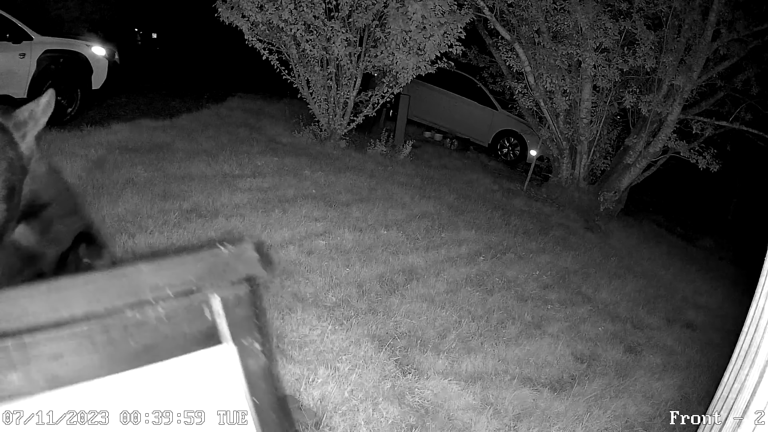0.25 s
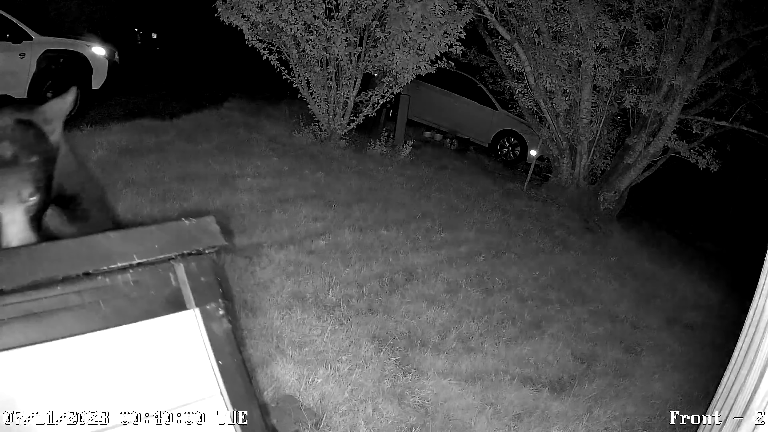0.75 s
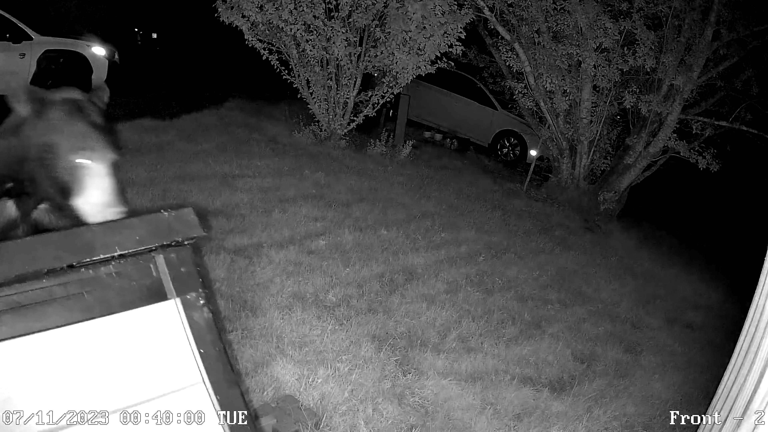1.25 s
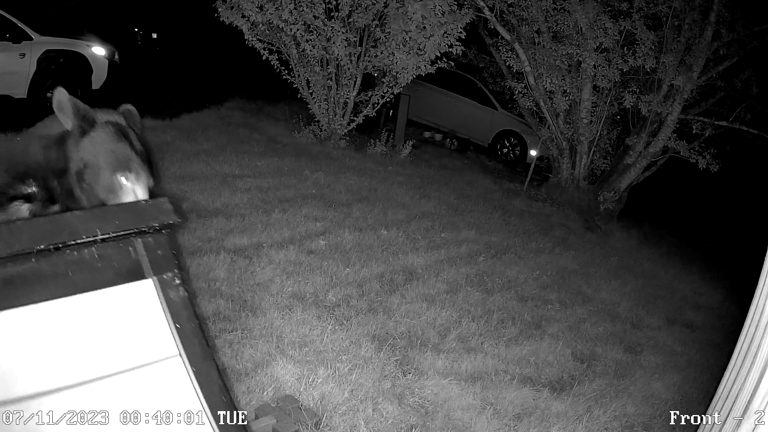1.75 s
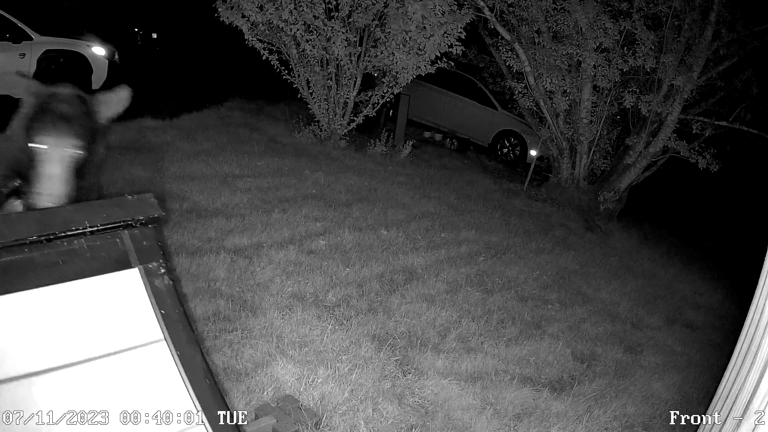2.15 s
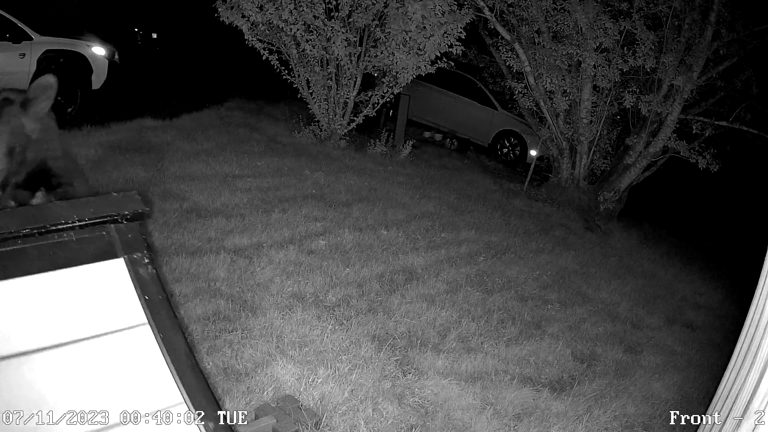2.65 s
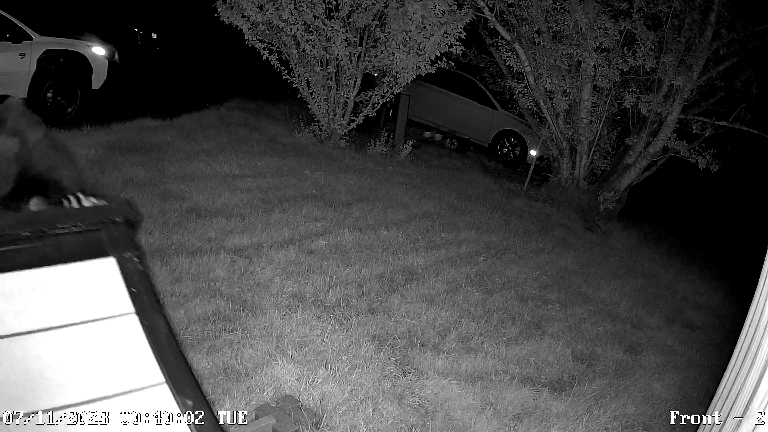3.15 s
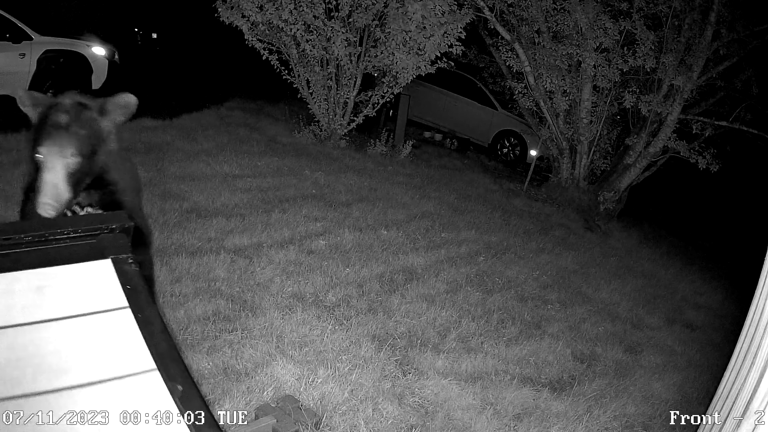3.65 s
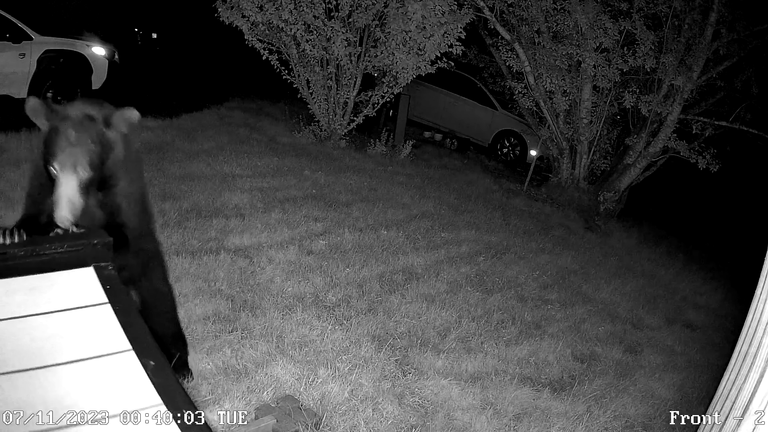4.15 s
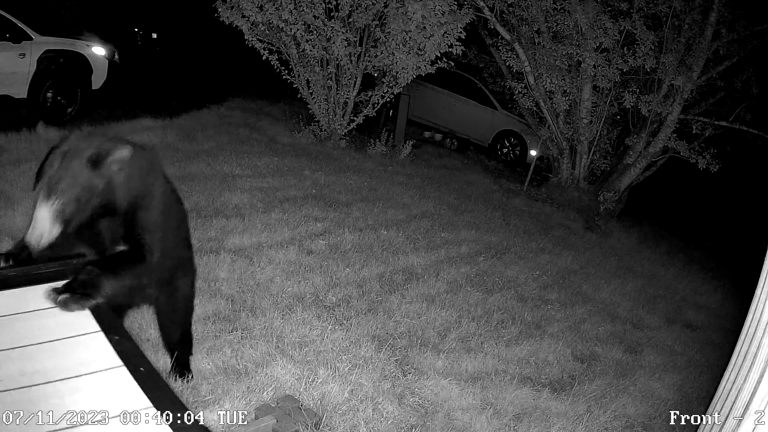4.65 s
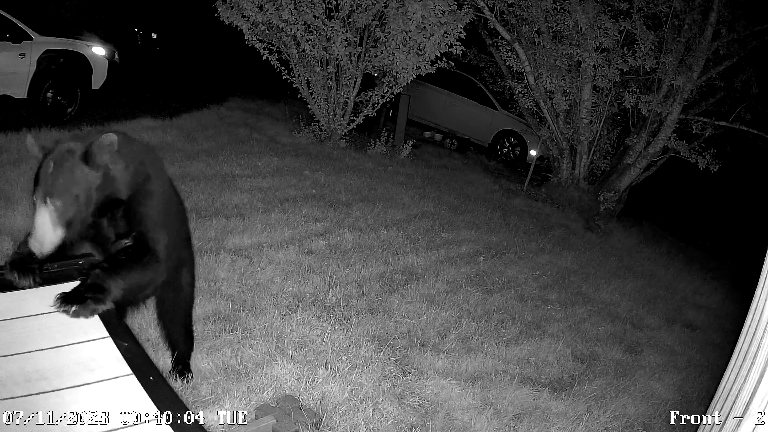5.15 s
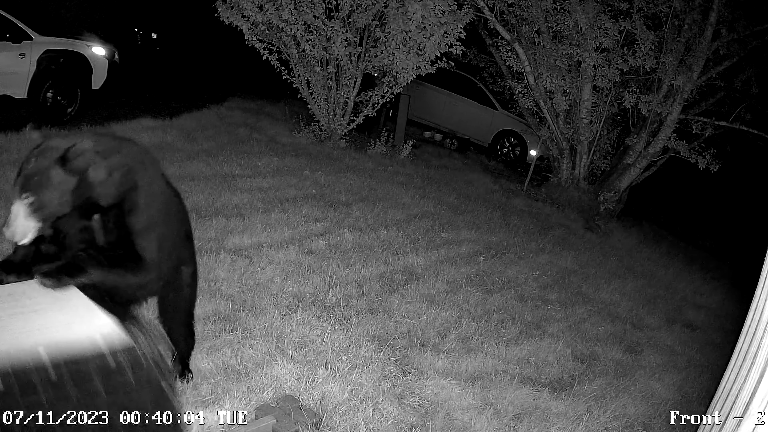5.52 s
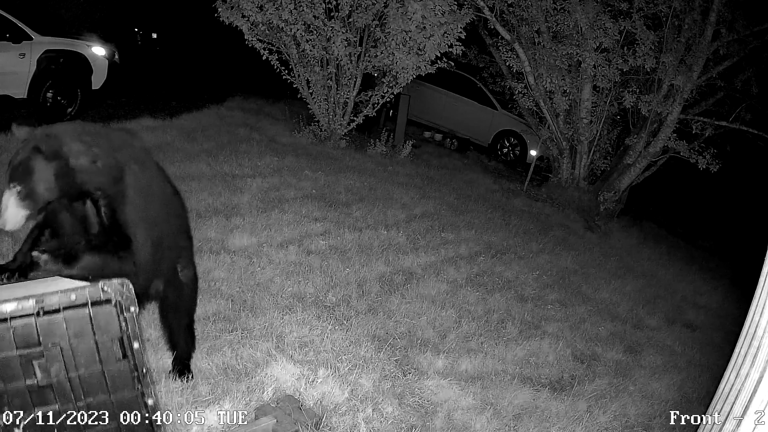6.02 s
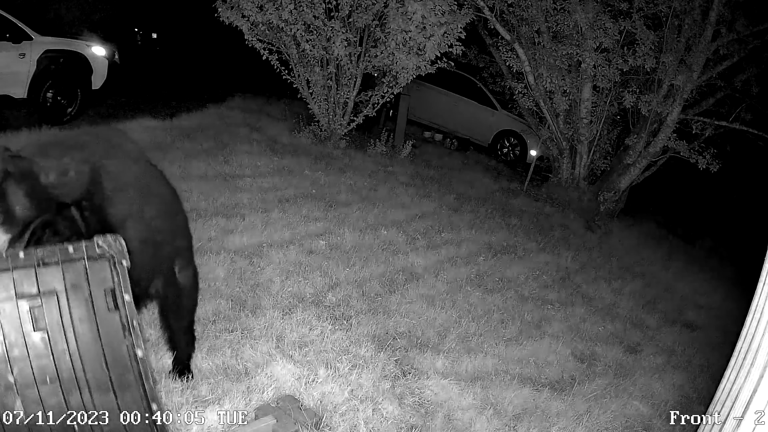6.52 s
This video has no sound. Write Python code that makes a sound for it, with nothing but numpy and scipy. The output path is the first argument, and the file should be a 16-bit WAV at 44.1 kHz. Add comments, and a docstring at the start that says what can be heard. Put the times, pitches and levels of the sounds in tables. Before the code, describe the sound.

A large, hollow plastic bin is pushed, dragged and tipped on a quiet night lawn. Soft scuffs give way to a burst of thumps, near-quiet with one small clonk, then a second run of hard knocks. Rasping grit and sharp clicks build to the loudest crash, a tumble of deep booms, then two lone blows. Slightly dull, band-limited close pickup with a short, weak outdoor echo.

```python
"""A bear paws at a big hollow plastic bin beside a house at night, drags it and tips it over.
Light shoves and faint knocks come first, then booming blows, one light clonk and a second run of blows.
Gritty scraping and short bright ticks lead to the heaviest crash of booms; two strong single blows follow.
Scrapes rasp by stick and slip and feed resonances; blows excite decaying modes and rebound once.
A small outdoor camera microphone close by hears it over a faint, steady hiss of filtered noise."""
import sys
import numpy as np
from scipy import signal
from scipy.fft import rfft, irfft, next_fast_len
from scipy.io import wavfile

SR = 44100
rng = np.random.default_rng(int(sys.argv[2]) if len(sys.argv) > 2 else 0)


def store_wav(level_fs):
    """Save 16-bit WAV to argv[1]."""
    pcm = np.round(np.clip(np.atleast_2d(level_fs), -1, 1) * 32767)
    wavfile.write(sys.argv[1], SR, pcm.T.astype(np.int16))


N = 298998
TIME = np.arange(N) / SR


def from_db(db):
    """Logarithmic level: 20 dB is a tenfold amplitude."""
    return 10 ** (np.asarray(db) / 20)


def rms_one(x):
    """Normalisation: divide by the root mean square for unit power."""
    return x / np.sqrt(np.mean(x ** 2) + 1e-20)


def add(out, start_s, sound):
    """Superposition: mix a sound in from its start time."""
    start = round(start_s * SR)
    out[start:start + len(sound)] += sound[:N - start]


def dying(t, t60):
    """Exponential decay: amplitude falls 60 dB in t60 seconds."""
    return np.exp(-np.log(1000) * t / t60)


def swell(t, rise, t60):
    """Onset and decay: a straight rise, then an exponential fall."""
    return np.minimum(t / rise, 1) * dying(np.maximum(t - rise, 0), t60)


def drift(rate):
    """Random modulation: interpolated chance values, about rate new ones a second, unit power."""
    knots = rng.standard_normal(N // 16)
    return rms_one(np.interp(TIME * rate, np.arange(len(knots)), knots))


def coloured(x, points):
    """Minimum-phase filtering: impose a spectrum causally at unit power gain, via the folded cepstrum."""
    size = next_fast_len(N + SR // 2, real=True) // 2 * 2
    hz, db = np.transpose(points)
    grid_hz = np.maximum(np.arange(size // 2 + 1) * SR / size, 1)
    shape_db = np.interp(np.log(grid_hz), np.log(hz), db)
    cepstrum = irfft(np.log(rms_one(from_db(shape_db))))
    cepstrum[1:size // 2] *= 2
    cepstrum[size // 2 + 1:] = 0
    response = np.exp(rfft(cepstrum))
    return irfft(rfft(x, size) * response)[:N]


def band(x, hz, width_hz, order=2):
    """Resonance: pass a band whose edges have hz as their geometric mean."""
    low = np.hypot(hz, width_hz / 2) - width_hz / 2
    edges = [low, min(low + width_hz, SR / 2 - 1)]
    return signal.sosfilt(signal.butter(order, edges, "band", fs=SR, output="sos"), x)


def lowpass(order, hz):
    """Low-pass filtering: a Butterworth design that rolls off above hz."""
    return signal.butter(order, hz, fs=SR, output="sos")


def resonate(force, modes, wander_db, wanders_per_s):
    """Modal coupling: a moving contact feeds each resonance unevenly; unit power gain overall."""
    out, total = np.zeros(N), 0
    for hz, db, width_hz in modes:
        feed = rms_one(from_db(wander_db * drift(wanders_per_s)))
        # a narrow band passes little power, so lift it by its noise bandwidth
        lift = np.sqrt(SR / (np.pi * width_hz))
        out += from_db(db) * band(force * feed, hz, width_hz, order=1) * lift
        total += from_db(db) ** 2
    return out / np.sqrt(total)


def slips(per_s, spread_db, clump_db, clumps_per_s):
    """Stick-slip friction: random jolts of uneven size that come in clumps; unit power."""
    sizes = from_db(spread_db * np.minimum(rng.exponential(1, N), 4)) * rng.choice([-1, 1], N)
    happens = rng.random(N) < per_s / SR
    return rms_one(sizes * happens * from_db(clump_db * drift(clumps_per_s)))


# shoves and drags of the bin, and the soft scuff and low rumble around some blows;
# drive levels before filtering
# columns: full_force_s, hold_s, fade_by_20_db_s, edge_rasp_db, grit_relative_to_rasp_db,
# wall_drone_db, panel_rumble_db
SHOVES_AND_SCUFFS = [(0.0, 0.057, 0.15, -55.5, -9, -44.5, -50.5),
                     (0.209, 0.26, 0.17, -57.5, -8.5, -45.5, -50.5),
                     (0.46, 0.055, 0.08, -61.5, -3.5, -40, -44.5),
                     (0.657, 0.014, 0.13, -56.5, -10, -45.5, -48.5),
                     (1.001, 0.13, 0.1469, -45, -24, -36, -29), (1.125, 0.03, 0.0362, -35, -6, -27.5, -35),
                     (1.215, .06, 0.196, -39.5, -8, -31.5, -28),
                     (1.321, 0.049, 0.1873, -48, -20, -35.5, -34.5),
                     (2.669, 0.039, 0.18, -67, -3.5, -44.5, -40),
                     (2.941, 0.34, 0.0438, -45.5, -7.5, -39, -32),
                     (3.187, 0.2, .08, -38.5, -4.5, -32.5, -29),
                     (3.272, 0.039, 0.0453, -29.5, -3.5, -28, -38),
                     (3.416, 0.73, 0.43, -53.5, -1, -48, -47), (3.509, 0.042, 0.08, -45.5, 0.5, -42, -49.5),
                     (3.734, 0.061, 0.13, -53, -2, -44.5, -36),
                     (4.073, 0.018, 0.12, -43.5, -6.5, -41.5, -36.5),
                     (4.289, 0.011, 0.16, -45.5, 2.5, -45.5, -50.5),
                     (4.356, 0.032, 0.0969, -40, -0.5, -35, -30.5),
                     (4.461, .05, 0.1235, -27.5, -3, -26.5, -31),
                     (4.594, 0.093, 0.0933, -48, -5.5, -32, -21.5),
                     (4.843, 0.19, 1.1, -70, 6, -64.5, -55.5),
                     (5.057, 0.027, 0.09, -55.5, -8, -46.5, -48.5),
                     (5.259, .11, 0.13, -70, -19, -53.5, -40), (5.5, .18, 0.06, -65, -8, -54.5, -49),
                     (5.73, .015, 0.09, -49, -8.5, -39.5, -26), (6.248, 0.04, 0.03, -54.5, -8, -36, -24.5)]
# the bin never quite rests under the bear's weight
# columns: edge_rasp_db, grit_relative_to_rasp_db, wall_drone_db, panel_rumble_db
LEANING = (-73, -1, -65, -57)
BUILD_SHARE = 0.58   # a shove or scuff builds up in this share of its fading time
RUMBLE_LINGERS = 1.14   # the panels fade this many times more slowly than the edge


def shoves_and_scuffs():
    """Power summation of build, hold and fade: levels in dB of rasp, grit re rasp, drone and rumble."""
    rasp, grit, drone, rumble = LEANING
    power = np.outer(from_db([rasp, rasp + grit, drone, rumble]) ** 2, np.ones(N))
    for start_s, hold, fade, rasp, grit, drone, rumble in SHOVES_AND_SCUFFS:
        early = np.maximum(start_s - TIME, 0) / (BUILD_SHARE * fade)
        late = np.maximum(TIME - start_s - hold, 0) / fade
        near = early + late < 4   # beyond this the edge is 80 dB down
        edge_db = -20 * (early + late)[near]
        panel_db = -20 * (early + late / RUMBLE_LINGERS)[near]
        levels_db = [rasp + edge_db, rasp + grit + edge_db, drone + edge_db, rumble + panel_db]
        power[:, near] += from_db(levels_db) ** 2
    rasp_db, sand_db, drone_db, rumble_db = 10 * np.log10(power)
    return rasp_db, sand_db - rasp_db, drone_db, rumble_db


# stiff side walls, which the blows also ring; columns: pitch_hz, relative_level_db, t60_s
WALL_MODES = [(158.4, -2, 0.27), (199, 2, 0.11), (227.5, 0.5, 0.18), (281.3, 7, 0.097), (346.6, 4, 0.17),
              (388.4, 2, 0.11), (420.7, 5, 0.099), (493, -6, 0.2), (517, -5, 0.035), (605.4, 5.5, .1),
              (635, -25.5, 0.082)]
# ribs and rim of the bin; columns: pitch_hz, relative_level_db, width_hz
RIM_MODES = [(1050, -1.5, 6.6), (1197, 3, 7.3), (1250, 13, 9.9), (1399, 6.5, 30), (1539, 4, 33),
             (1674, 2, 31), (1970, -2.5, 8.8), (2120, -3.5, 7.2), (2314, -6, 20), (2467, -14.5, 17),
             (2680, -2.5, 26), (3050, -9, 11)]
# their higher ringing, stirred by grit; columns: pitch_hz, relative_level_db, width_hz
GRIT_MODES = [(3105, 1, 44), (3240, -1, 90), (3970, -0.5, 72), (4255, -1.5, 120), (4260, -10, 67),
              (5190, -3, 26), (5430, -11.5, 29), (5350, -5, 200)]
# spectrum of the rasping edge; columns: frequency_hz, relative_level_db (per Hz)
RASP = [(400, -6.5), (650, -8.5), (830, -8.5), (1150, 2), (1550, 0.5), (1800, -2), (2130, -0.5), (2500, -2),
        (2900, -15.5), (3700, -21), (6000, -47)]
# spectrum of the grit's crunch; columns: frequency_hz, relative_level_db (per Hz)
GRIT = [(1800, -42.5), (2700, -3.5), (3200, 6.5), (4200, 14), (5400, 7), (6000, -14), (7000, -2),
        (8000, -55.5)]
# spectrum of the droning walls; columns: frequency_hz, relative_level_db (per Hz)
DRONE = [(80, -19.5), (140, -6), (230, -3), (330, -1.5), (440, -4.5), (560, -2.5), (680, -8.5), (850, -13),
         (1500, -72)]
# spectrum of the rumbling big panels; columns: frequency_hz, relative_level_db (per Hz)
RUMBLE = [(12, -5.5), (30, -2), (45, 6.5), (80, 3), (125, -3), (160, -8.5), (220, -26), (400, -69.5)]


def scraping(rim_db, grit_ring_db, dry_db, wall_db, dull_db, soft_hz, softening):
    """Friction-driven vibration: the sliding edge rasps and grinds grit; jolts shake rim and shell."""
    rasp_db, grit_db, drone_db, rumble_db = shoves_and_scuffs()
    judder = rms_one(from_db(2.16 * drift(60)))   # the edge catches and lets go
    edge_slips = slips(per_s=2400, spread_db=1.0, clump_db=1.5, clumps_per_s=200)
    edge = from_db(rasp_db) * judder * edge_slips
    sand = edge * from_db(grit_db)
    # the less grit under the edge, the softer and duller its crunch
    soft = signal.sosfiltfilt(lowpass(3, soft_hz), sand)
    sand = soft + (sand - soft) * from_db(softening * np.minimum(grit_db, 0))
    rub = from_db(dry_db) * (coloured(edge, RASP) + coloured(sand, GRIT))
    ring = from_db(rim_db) * resonate(edge, RIM_MODES, wander_db=10.0, wanders_per_s=24)
    ring += from_db(grit_ring_db) * resonate(sand, GRIT_MODES, wander_db=9.0, wanders_per_s=24)
    # fewer jolts a second shake the whole shell
    shudder = slips(per_s=900, spread_db=1.0, clump_db=0.9, clumps_per_s=59)
    push = shudder * judder * from_db(drone_db)
    # a mode's decay time sets its bandwidth
    walls = [(hz, db, np.log(1000) / (np.pi * t60)) for hz, db, t60 in WALL_MODES]
    drone = from_db(dull_db) * coloured(push, DRONE)
    drone += from_db(wall_db) * resonate(push, walls, wander_db=10.5, wanders_per_s=12)
    rumble = coloured(shudder * from_db(rumble_db), RUMBLE)
    return rub - ring + drone + rumble


BEND_OCTAVES = 0.058   # the shell is bent differently at every blow, which shifts its modes


def ringing(modes, t, scatter_db):
    """Modal vibration: one dying sine a row, with a random strength and detuning of its own."""
    hz, db, t60 = np.transpose(modes)[:, :, None]
    hz = hz * 2 ** (BEND_OCTAVES * rng.standard_normal(hz.shape))
    strength = from_db(db + scatter_db * rng.standard_normal(hz.shape))
    return strength * np.sin(2 * np.pi * hz * t) * dying(t, t60)


# blows on the bin, as drive levels; wall pitch is that of the struck place, crack top its filter cutoff
# columns: start_s, rebound_after_s, boom_db, wall_ring_db, crack_db, wall_pitch_hz, crack_top_hz
KNOCKS = [(0.282, .017, -55, -32, -58, 540, 2000), (0.452, .02, -46, -34, -45, 350, 2000),
          (0.688, .02, -57, -36, -62.5, 600, 2000), (0.96, 0.029, -36.5, -39, -43.5, 219, 2000),
          (0.995, .016, -19.5, -19, -34.5, 334, 4000), (1.104, .011, -31.5, -15, -22.5, 607, 3500),
          (1.23, .02, -28, -23.5, -32.5, 277, 3000), (1.422, .02, -36, -30, -39, 303, 2380),
          (2.205, .02, -43, -42, -59, 200, 4000), (2.647, .015, -36.5, -31, -57, 221, 800),
          (2.718, .014, -52, -22.5, -41.5, 438, 895), (2.944, .012, -27, -16.5, -31.5, 373, 4000),
          (2.957, .025, -23.5, -12.5, -39.5, 145, 1500), (3.027, .03, -29.5, -23, -34.5, 340, 2980),
          (3.184, .008, -22, -16, -30.5, 314, 1200), (3.269, .015, -25, -20, -29.5, 308, 4000),
          (3.744, 0.018, -32.5, -45, -41.5, 300, 1000), (3.922, .034, -24, -11.5, -24, 391, 3560),
          (4.352, .015, -29, -30, -46.5, 420, 5030), (4.508, .011, 0, -3, -18, 226, 1000),
          (4.547, .02, -11, -19.5, -29, 450, 1200), (4.584, .029, -4, -13.5, -25, 420, 2400),
          (4.637, .01, -3, -16, -27.5, 201, 3000), (4.69, .02, -18, -34, -30, 455, 1500),
          (4.742, .015, -18, -28.5, -39.5, 314, 2000), (5.217, .03, -51, -37.5, -46, 447, 1880),
          (5.246, .02, -28, -44, -61, 110, 800), (5.718, .005, -14, -19, -32.5, 213, 2000),
          (6.264, .006, -12, -12.5, -22.5, 249.4, 620), (6.377, .012, -57, -38, -46, 376, 3000)]
# a rebound is softer the later it comes, and lower in pitch
REBOUND_WALL_DB_PER_S, REBOUND_CRACK_DB_PER_S, REBOUND_PITCH_RATIO = -250, -450, .65


def contacts():
    """Rebound: each blow strikes twice, weaker the second time; only the blow itself booms."""
    for start_s, gap, boom_db, wall_db, crack_db, pitch_hz, top_hz in KNOCKS:
        yield start_s, from_db(boom_db), wall_db, crack_db, pitch_hz, top_hz
        rebound_wall_db = wall_db + REBOUND_WALL_DB_PER_S * gap
        rebound_crack_db = crack_db + REBOUND_CRACK_DB_PER_S * gap
        yield start_s + gap, 0, rebound_wall_db, rebound_crack_db, REBOUND_PITCH_RATIO * pitch_hz, top_hz


# the big panels and the air inside; columns: pitch_hz, relative_level_db, t60_s
BOOM_MODES = [(66.5, -5, 0.15), (83.6, -1, 0.21), (97.8, -4, .12), (124.2, -3, 0.1)]
# spectrum of the contact crack; columns: frequency_hz, relative_level_db (per Hz)
CRACK = [(300, -4.5), (600, 8), (850, -4.5), (1120, 6), (1700, -6), (2250, 1.5), (2800, -5.5), (3400, -0.5),
         (4500, -12.5), (7000, -41.5)]


def knocks(reach_octaves, dent_t60, ring_db, boom_rise_s, snap_db, crack_t60, rattle_db, rattle_t60):
    """Impact excitation: a dead clack, wall modes near its pitch, and the hollow body's swelling boom."""
    t = TIME[:SR // 2]
    body, contact = np.zeros(N), np.zeros(N)
    wall_hz = np.array(WALL_MODES)[:, 0]
    for start_s, boom_gain, wall_db, crack_db, pitch_hz, top_hz in contacts():
        # modes near the struck pitch take the larger share
        share = 1 / (1 + (np.log2(wall_hz / pitch_hz) / reach_octaves) ** 2)
        share = share / np.linalg.norm(share) * rng.choice([-1, 1], len(share))
        dent = np.sin(2 * np.pi * pitch_hz * t) * dying(t, dent_t60)
        walls = share @ ringing(WALL_MODES, t, scatter_db=4.0)
        walls = from_db(ring_db) * walls * (1 - dying(t, dent_t60))   # rises as the dent dies
        boom = ringing(BOOM_MODES, t, scatter_db=4.5).sum(axis=0)
        boom = boom * (1 - np.exp(-t / boom_rise_s))
        add(body, start_s, from_db(wall_db) * (dent + walls) + boom_gain * boom)
        # one sharp snap, then loose parts rattle; a softer contact is duller
        fall = dying(t, crack_t60) + from_db(rattle_db) * dying(t, rattle_t60)
        crack = rng.standard_normal(len(t)) * fall
        crack[0] += from_db(snap_db)
        add(contact, start_s, from_db(crack_db) * signal.sosfilt(lowpass(2, top_hz), crack))
    return body + coloured(contact, CRACK)


# grains snap at random: mean rate, nominal peak above the grit's drive level, median centre
STRAY_TICKS_PER_S, STRAY_TICK_DB, STRAY_TICK_HZ = 22, 14, 3180


def stray_ticks(scatter_db, scatter_octaves):
    """Random point process: grains snap singly, louder the harder the edge grinds; rows as in TICKS."""
    rasp_db, grit_db, _, _ = shoves_and_scuffs()
    moments = np.flatnonzero(rng.random(N) < STRAY_TICKS_PER_S / SR)
    grains = []
    for i in moments:
        level_db = rasp_db[i] + grit_db[i] + STRAY_TICK_DB + scatter_db * rng.normal()
        centre_hz = STRAY_TICK_HZ * 2 ** (scatter_octaves * rng.normal())
        grains.append((TIME[i], level_db, centre_hz))
    return grains


# short bright ticks: claws on the plastic, and sharp cracks within the heaviest crash
# columns: start_s, relative_peak_db, centre_hz
TICKS = [(0.389, -46, 1700), (2.672, -39, 1980), (3.081, -25.5, 2700), (3.514, -25, 2190),
         (3.560, -21, 3800), (3.8, -21, 2250), (4, -28.5, 5430), (4.254, -21, 2580), (4.327, -22, 4020),
         (4.519, -6.5, 3500), (4.641, -13.5, 2500), (4.878, -37, 2400), (5.121, -35.5, 4300),
         (5.134, -34, 3000), (5.3, -48, 1200), (5.36, -34, 1810), (5.579, -30.5, 2190),
         (6.232, -31.5, 4500)]


def ticks(t60, snap_db, level_db):
    """Impulse response: a sharp contact gives a snap and a few milliseconds of broad, bright ringing."""
    t, out = TIME[:SR // 10], np.zeros(N)
    for start_s, peak_db, hz in TICKS + stray_ticks(scatter_db=3, scatter_octaves=.4):
        tap = rng.standard_normal(len(t)) * dying(t, t60)
        tap[0] += from_db(snap_db)
        tick = band(tap, hz, 1.2 * hz, order=1)
        add(out, start_s, from_db(peak_db + level_db) * tick / np.abs(tick).max())
    return signal.sosfilt(lowpass(4, 5800), out)


# short squeaks and rubs of the plastic; columns: start_s, centre_hz, width_hz, level_db, rise_s, t60_s
SQUEAKS = [(0.27, 1580, 261, -56, 0.015, 0.58), (0.442, 1540, 256, -49, 0.062, 0.11),
           (0.606, 1000, 230, -48.5, 0.03, 0.24), (0.983, 3460, 750, -41, 0.01, 0.41),
           (2.38, 175, 50, -51.5, 0.052, 0.93), (2.662, 1920, 450, -54, 0.011, 0.11),
           (2.713, 1094, 750, -48, 0.021, 0.22), (2.728, 308, 60, -29.5, 0.005, 0.2),
           (5.361, 3394, 171, -40, 0.00069, 0.12), (6.31, 4910, 250, -53, .003, 0.1)]


def squeaks(steadiness):
    """Friction-fed resonance: a brief rub's narrow-band swing is held fairly even as it swells and dies."""
    t, out = TIME[:SR // 3], np.zeros(N)
    for start_s, hz, width_hz, level_db, rise, t60 in SQUEAKS:
        # the analytic signal's magnitude is the envelope; skip the filter's onset
        tone = signal.hilbert(band(rng.standard_normal(SR // 2), hz, width_hz))[-len(t):]
        even = rms_one(tone.real / np.abs(tone) ** steadiness)
        add(out, start_s, from_db(level_db) * swell(t, rise, t60) * even)
    return out


# resonances of one light, hollow clonk; columns: pitch_hz, width_hz, level_db, t60_s
CLONK_MODES = [(580, 210, -47.5, 0.18), (1040, 93, -43, 0.13), (1394, 150, -51, 0.26),
               (2000, 500, -56.5, .11)]
CLONK_S, CLONK_RISE_S = 1.996, 0.019


def clonk():
    """Damped resonance: a soft bump sets a few broad bands ringing briefly."""
    t, out = TIME[:SR // 3], np.zeros(N)
    for hz, width_hz, level_db, t60 in CLONK_MODES:
        tone = rms_one(band(rng.standard_normal(SR // 2), hz, width_hz)[-len(t):])
        add(out, CLONK_S, from_db(level_db) * swell(t, CLONK_RISE_S, t60) * tone)
    return out


def yard(x, t60, echo_db):
    """Diffuse reverberation: house wall and trees scatter a weak, short tail."""
    t = TIME[:SR]
    tail = rng.standard_normal(len(t)) * dying(t, t60) * (t > .012)   # nothing returns before 12 ms
    return x + from_db(echo_db) * signal.fftconvolve(x, tail / np.linalg.norm(tail))[:N]


# spectrum of the background hiss; columns: frequency_hz, relative_level_db (per Hz)
HISS = [(15, 14.5), (60, 2.5), (120, -0.5), (250, -13), (600, -14), (1500, -20.5), (3000, -22.5),
        (5500, -24), (6200, -25.5), (7500, -35.5)]
HISS_DB = -57.5


def night_hiss():
    """Stationary noise: white noise filtered to fall from the bass to the treble."""
    return from_db(HISS_DB) * coloured(rng.standard_normal(N), HISS)


def scene():
    """Superposition: the bin and its echoes in the yard over the night's hiss."""
    scrapes = scraping(rim_db=-12.0, grit_ring_db=-8.5, dry_db=-1.5, wall_db=-9.0, dull_db=-3.5,
                       soft_hz=4200, softening=1.0)
    blows = knocks(reach_octaves=0.47, dent_t60=0.05, ring_db=-8.0, boom_rise_s=0.006, snap_db=4,
                   crack_t60=0.031, rattle_db=-14.5, rattle_t60=0.24)
    bright_ticks = ticks(t60=0.023, snap_db=13.5, level_db=-3.5)
    bin_sound = scrapes + blows + bright_ticks + squeaks(steadiness=0.28) + clonk()
    return (yard(bin_sound, t60=0.43, echo_db=-20.0) + night_hiss())[None]


CUTOFF_HZ = 7350


def record(dry):
    """Saturation and band limiting: the small microphone rounds off big peaks and cuts the treble."""
    rounded = dry / (1 + dry ** 6) ** (1 / 6)
    steep = signal.ellip(10, .3, 80, CUTOFF_HZ, fs=SR, output="sos")   # 0.3 dB ripple, 80 dB stop
    return signal.sosfilt(steep, rounded)


dry = scene()
out = record(dry)
store_wav(out)
```